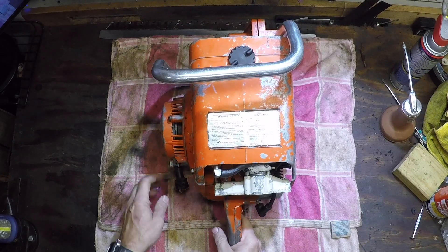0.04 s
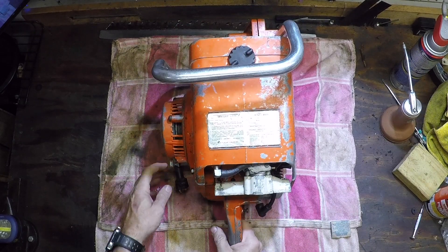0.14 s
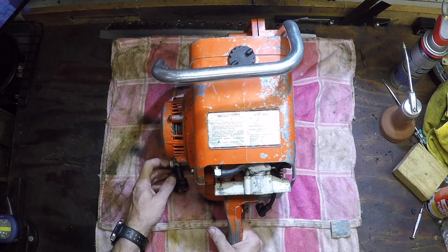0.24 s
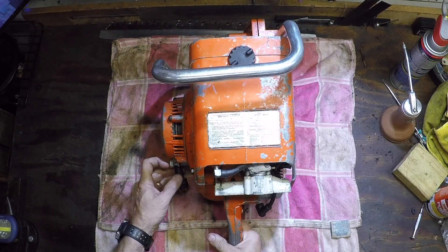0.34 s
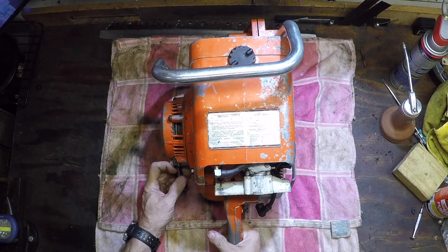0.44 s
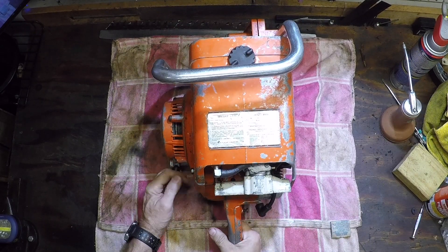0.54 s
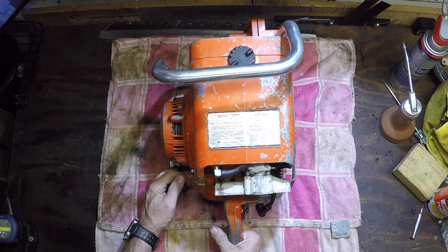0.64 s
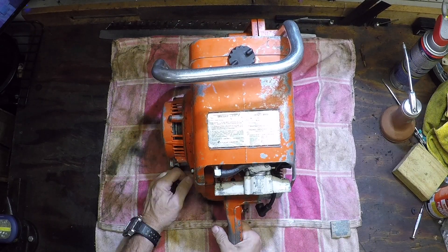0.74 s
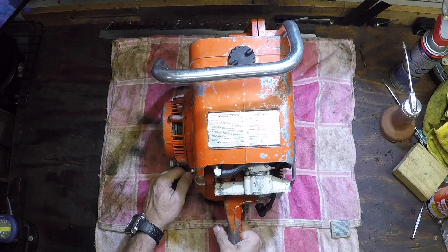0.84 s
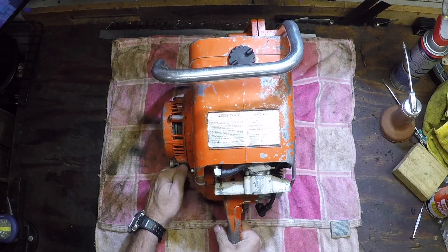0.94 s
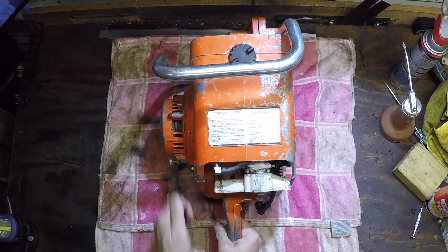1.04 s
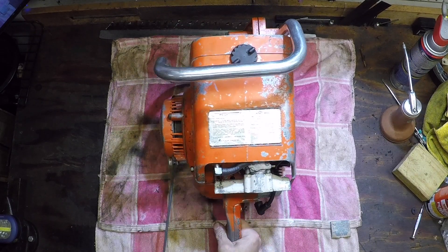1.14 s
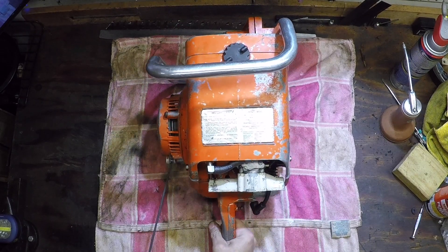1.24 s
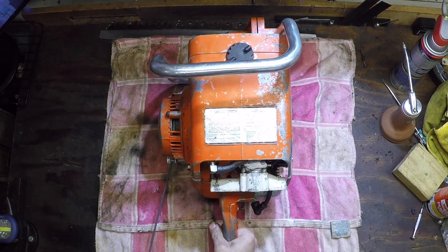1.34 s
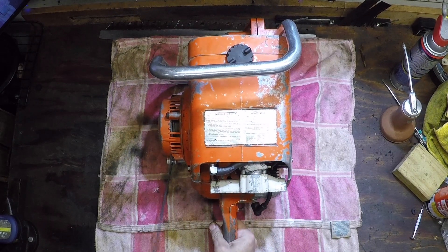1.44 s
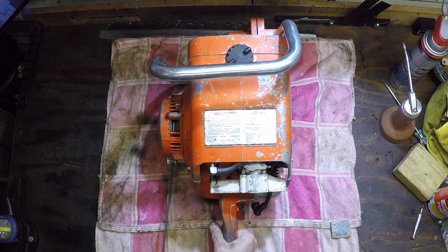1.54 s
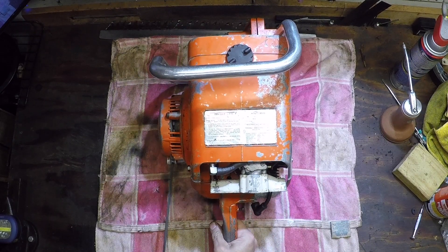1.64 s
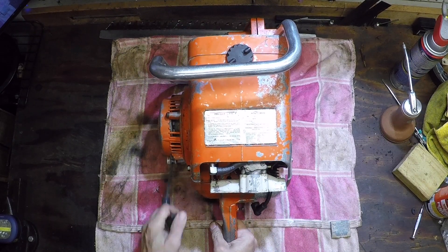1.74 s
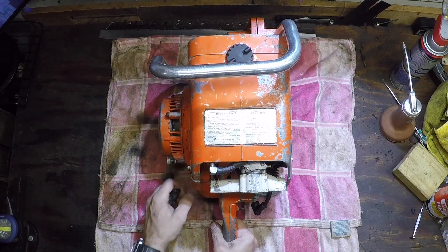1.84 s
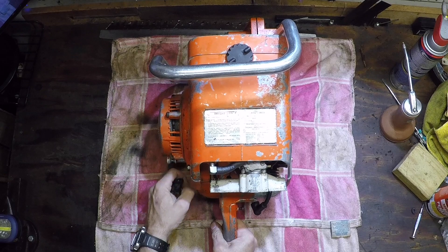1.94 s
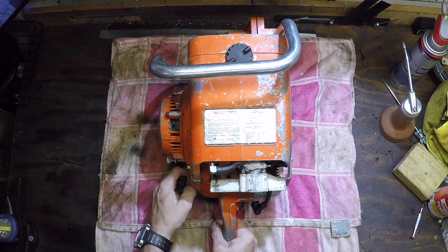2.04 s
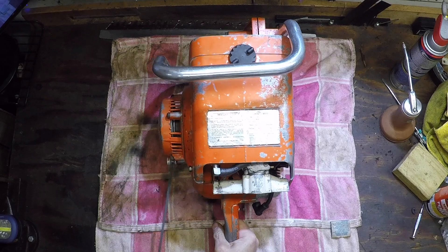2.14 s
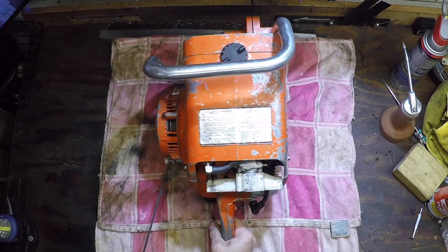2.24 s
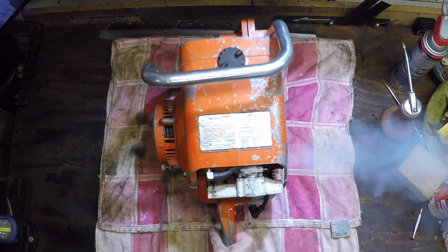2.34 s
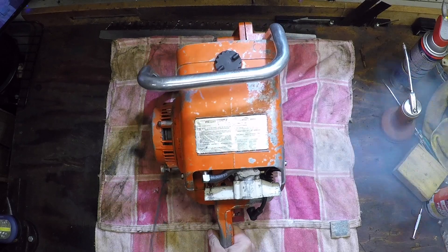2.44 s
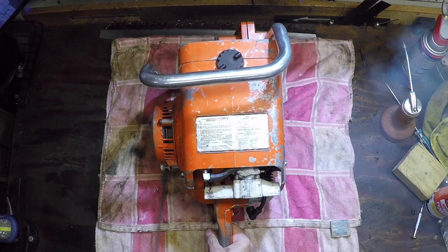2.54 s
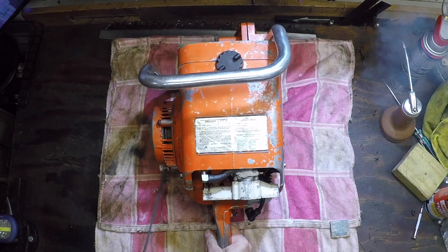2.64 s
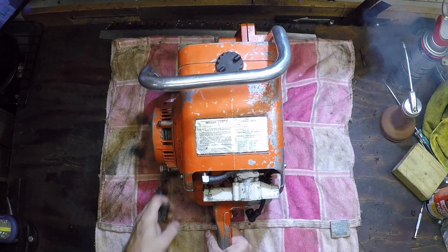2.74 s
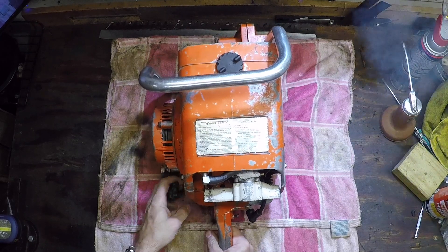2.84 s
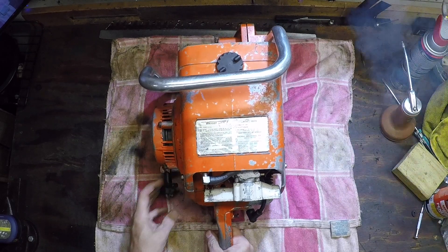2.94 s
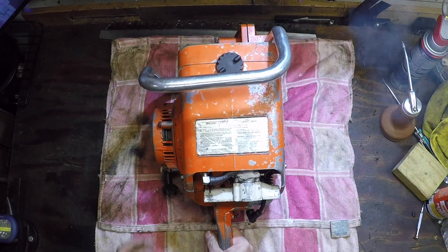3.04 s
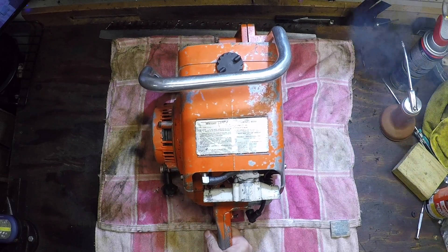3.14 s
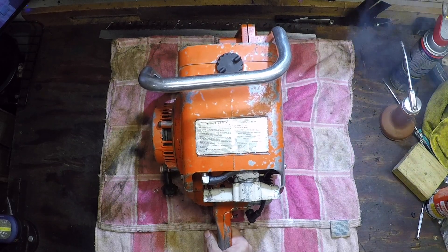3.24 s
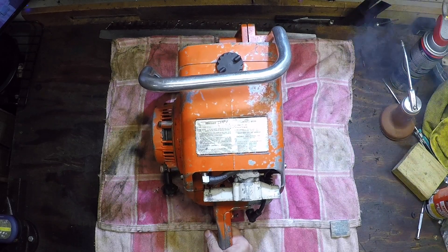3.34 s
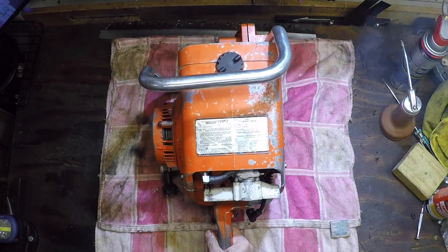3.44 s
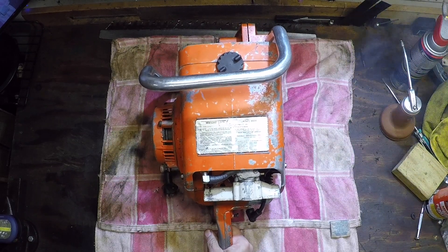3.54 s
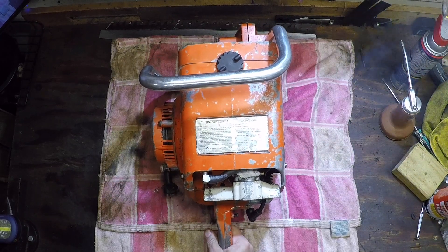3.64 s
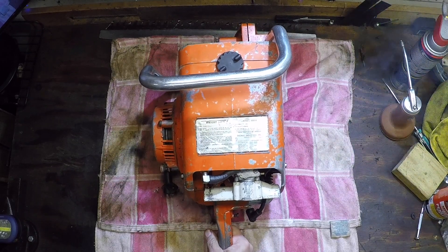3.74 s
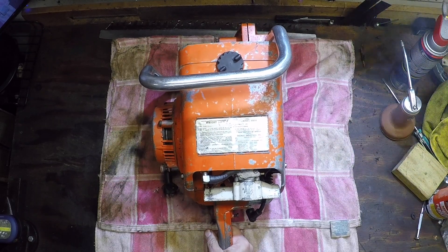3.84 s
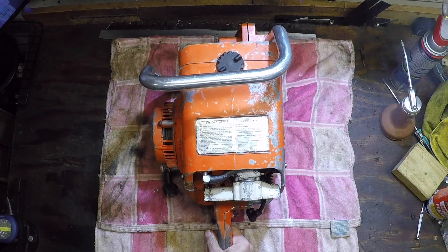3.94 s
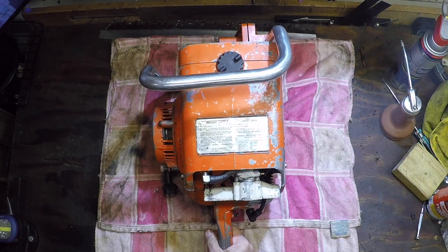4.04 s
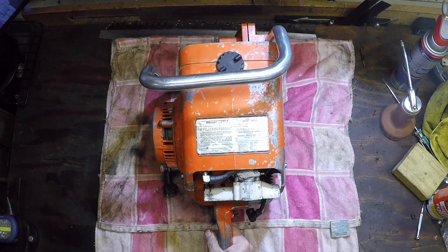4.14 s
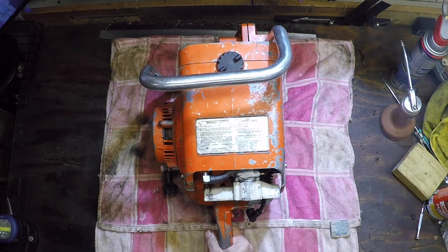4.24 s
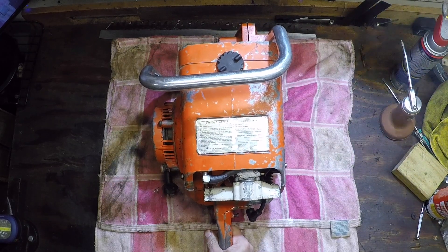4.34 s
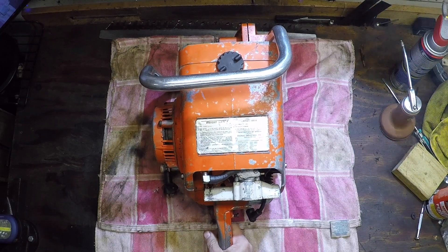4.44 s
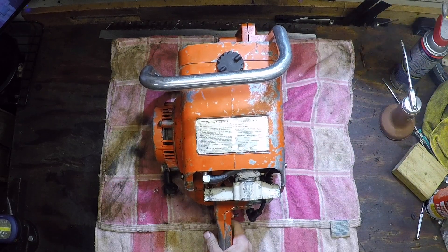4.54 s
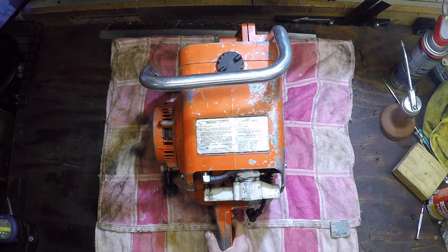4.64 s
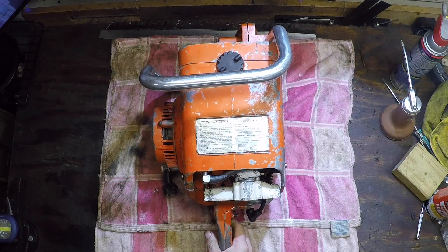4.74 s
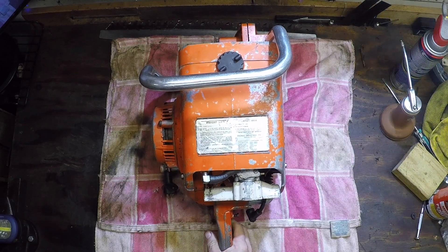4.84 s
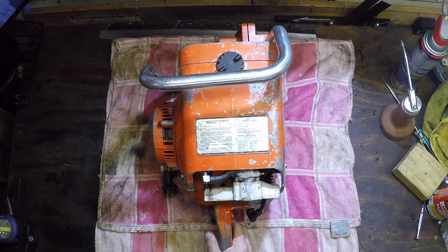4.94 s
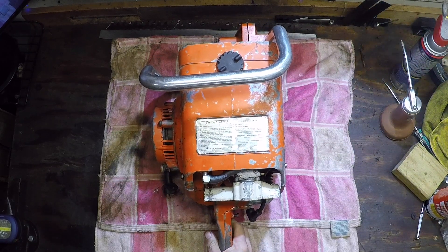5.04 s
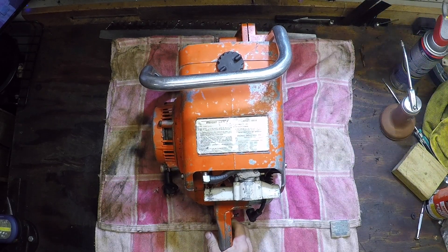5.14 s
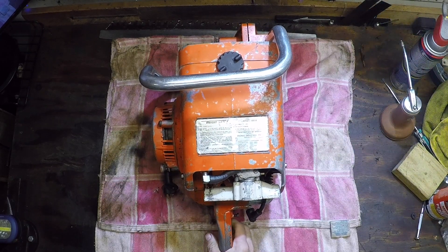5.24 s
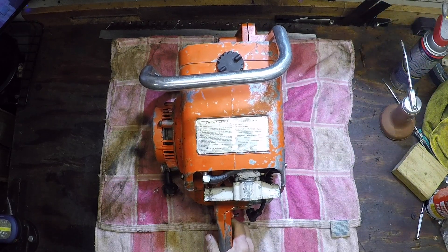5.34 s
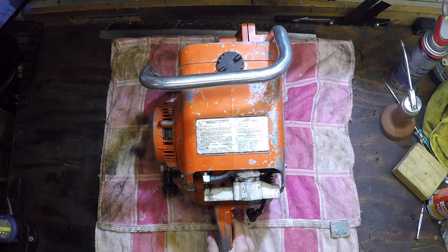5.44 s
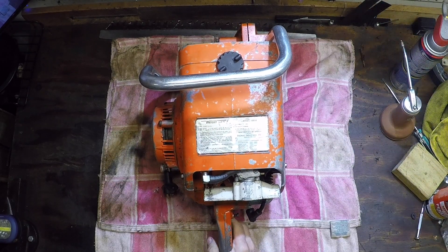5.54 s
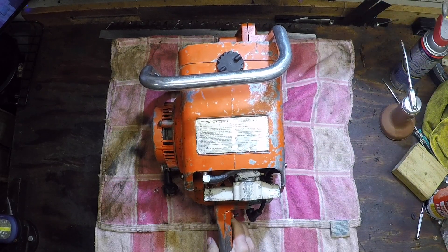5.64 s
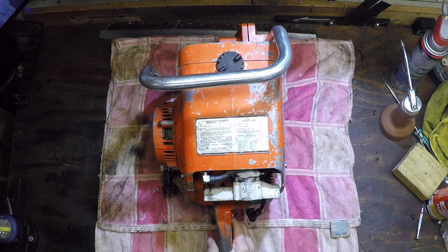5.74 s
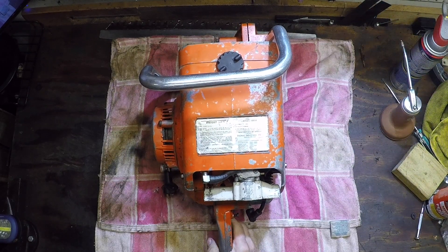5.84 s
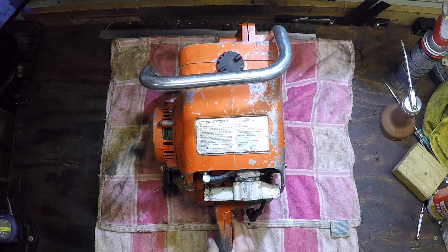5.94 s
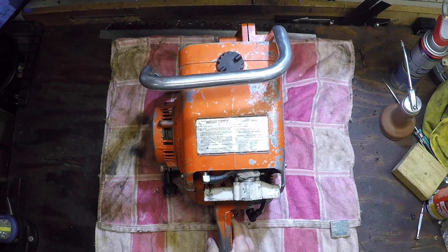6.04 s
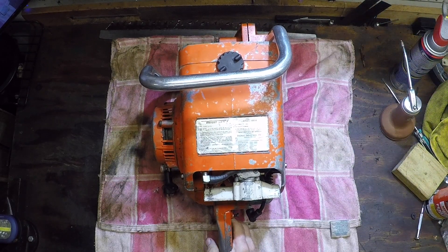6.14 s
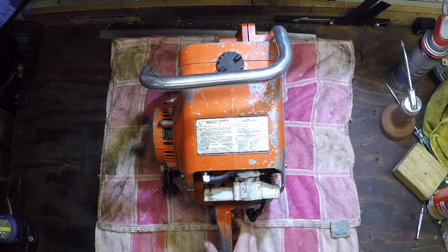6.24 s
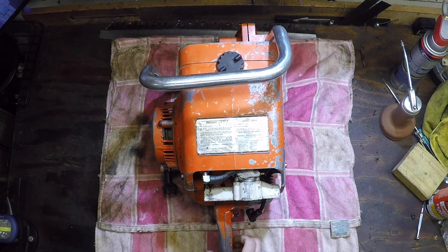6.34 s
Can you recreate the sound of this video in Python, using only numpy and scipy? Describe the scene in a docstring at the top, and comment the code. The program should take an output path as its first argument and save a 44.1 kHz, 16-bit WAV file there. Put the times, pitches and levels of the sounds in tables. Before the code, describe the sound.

Close up in a workshop with a low, steady hum, a lever clicks on a small two-stroke chainsaw. One rasping pull of the cord only turns the engine over in dull puffs. The next pull starts it for about a second of quick popping and metallic rattling. The firing falters, the whine falls and the engine chugs to rest, leaving just the quiet hum.

```python
"""A shop motor hums and the choke of a small two-stroke saw clicks on the bench. A first pull of the
starter cord turns the engine over; a second fires it: it pops, races, misses, coasts down and stops.
Each piston stroke pushes air through the muffler, each firing rings its shell, and cord, pawls and
loose parts shake the casing. A tick on every free turn blurs into a whine that follows the crank.
The hum sinks after the loud spells and climbs back."""
import sys
import numpy as np
from scipy import signal
from scipy.fft import rfft, irfft, next_fast_len
from scipy.io import wavfile
from scipy.ndimage import map_coordinates

SR = 44100
rng = np.random.default_rng(int(sys.argv[2]) if len(sys.argv) > 2 else 0)


def log_audio(samples):
    """Write samples as a 16-bit WAV file to the path given in sys.argv[1]."""
    # one column per channel
    frames = np.atleast_2d(samples).T
    # limit to full scale, then quantise
    limited = np.clip(frames, -1, 1)
    pcm = np.round(limited * 32767).astype(np.int16)
    wavfile.write(sys.argv[1], SR, pcm)


N = 281358
T = np.arange(N) / SR

# Levels are relative: each layer adds its own gain.
# fader moves of the shop bed: (time [s], air [dB], buzz [dB], drone [dB])
BED_FADERS = [(0.0, -39.5, -31.5, -38), (0.46, -38.5, -29.5, -48), (1.0, -38, -34, -25),
              (1.72, -45, -39, -31), (2.07, -44, -34, -35), (4.25, -57, -45, -40), (4.6, -50, -41, -45.5),
              (4.89, -48, -37.5, -39), (5.2, -43.5, -34.5, -32), (5.7, -39, -28.5, -32),
              (6.12, -39, -31, -30), (6.38, -39.5, -32.5, -36)]
# colour of the room air: (frequency [Hz], level [dB])
AIR_EQ = [(15, -47.5), (25, 6), (69, -5), (125, -7.5), (168, -14), (357, -17.5), (493, -30.5), (612, -21),
          (1330, -22.5), (4010, -43.5), (6330, -45), (10000, -57), (15400, -81)]
# stereo image of the air: (frequency [Hz], left-right likeness [0-1])
AIR_IMAGE = [(60, 0.86), (200, 0.96), (400, 0.58), (700, 0.021), (15000, 0.16)]
# soft swells of hiss, the tail of the first clicks and then a few faint rustles:
# (time [s], half-width [s], level [dB])
HISS_SWELLS = [(0.157, 0.081, -37.5), (0.823, 0.11, -52.5), (1.733, .02, -52), (4.536, .02, -60),
               (5.154, 0.021, -60), (6.128, 0.051, -48)]
# shaft orders of the shop motor: (frequency [Hz], level against the buzz [dB])
SHAFT_ORDERS = [(29, -29), (146, -20), (175, -15), (203, -23), (264, -23), (291, -30.5), (437, -29.5)]
# reverb of the workshop: (frequency [Hz], t60 [s])
ROOM_DECAY = [(100, 0.84), (1000, 0.35), (6000, 0.46), (14000, 0.05)]

# modes of casing, cover and handle: (frequency [Hz], width [Hz], level [dB])
CASING_MODES = [(702.2, 25.6, 4.5), (995, 42.5, 6.5), (1263, 22, 1.5), (1355, 12, -5.5), (1665, 47, 0.5),
                (2300, 140, -21), (3580, 500, -54)]
# modes of the starter pawls and steel handle: (frequency [Hz], width [Hz], level [dB])
STEEL_MODES = [(3510, 120, -8), (4120, 90, -11), (5500, 55, 0), (5820, 260, -1), (6500, 150, -6),
               (7200, 150, -9)]
# lever, pawl and handle hits: (time [s], level [dB], knock offset [dB], ring offset [dB])
CLICKS = [(0.0641, -7, -26, -11), (0.1206, -6, -1, -11), (0.389, -32, -14, 1.5), (1.0238, -17.5, -11, -13),
          (1.047, -5.5, -8, -0.5), (1.3245, -21, -19, 9.5), (1.4744, -14, 10, -36), (1.596, -25.5, 18, -22),
          (1.6253, -15.5, -2, -20), (2.0862, -28, -18, -18), (2.1115, -5, 4, -7.5),
          (2.1767, -13.5, 14, -27), (2.3207, -16.5, -16, -5), (3.7509, -25, -6, -4),
          (3.8047, -24.5, -5, -7), (3.8872, -21.5, -12, -12), (3.9795, -23.5, 10, -7),
          (4.0868, -36, 7, -20), (4.1117, -27, 6.5, -25), (4.5349, -48.5, 23.5, -12)]
# colour of a click's snap: (frequency [Hz], level [dB])
SNAP_EQ = [(530, -27.5), (900, -5), (1250, -15), (1650, -1.5), (2750, -11.5), (3970, -5), (4260, -12.5),
           (6090, -4.5), (13300, -39.5), (15400, -80.5)]
# shaking by cord, pawls, fan and loose parts, a list per pull: (time [s], casing [dB], fizz [dB])
RATTLE_FADERS = [
    [(1.0, -45, -74), (1.086, -26, -31), (1.23, -22.5, -26), (1.438, -29.5, -31), (1.596, -47, -44),
     (1.75, -66, -50)],
    [(2.07, -47, -47), (2.15, -25.5, -31.5), (2.26, -26.5, -27), (2.6, -28.5, -29), (3.02, -25, -26),
     (3.15, -34.5, -25.5), (3.43, -25.5, -29), (3.9, -40.5, -43), (4.15, -49, -58), (4.25, -71, -68.5)],
]
# colour of the air fizz: (frequency [Hz], level [dB])
FIZZ_EQ = [(710, -4.5), (1200, -3.5), (1710, 0), (2790, -7), (3640, -3.5), (4650, -9), (6140, -1.5),
           (10100, -19), (11300, -35), (13100, -27), (15400, -59)]
# crack on each bang, sharpest on the first firings: (time [s], offset from the bang [dB])
CRACK_FADER = [(2.2, -14), (2.32, -1), (2.6, -8), (2.8, -14)]
# casing modes that sing in the whine: (frequency [Hz], width [Hz], level [dB])
WHINE_MODES = [(454, 160, -7), (687, 350, -11), (999, 61, 2)]
# modes of the muffler shell, rung by hot gas: (frequency [Hz], width [Hz], level [dB])
SHELL_MODES = [(540, 75, -11), (616, 9.4, 7.5), (660, 11, -12)]
# modes of muffler, bench and walls: (frequency [Hz], width [Hz], level [dB], polarity [+1 or -1])
MUFFLER_MODES = [(43.4, 7.4, -11.5, 1), (96.6, 12.3, 2, 1), (146.5, 17.3, 2, -1), (188.2, 27.2, 5, -1),
                 (199, 225, -8.5, 1), (285.2, 15, 5.5, -1), (337, 4.4, 4.5, 1), (393.3, 25, 7, 1)]

# the cord drags the crank over, or it rocks to rest: (time [s], puff [dB], bang [dB])
SLOW_STROKES = [(1.055, -8, -28), (1.105, -28.5, -3.5), (1.178, -5, -6), (1.236, -2, -21), (1.298, -16, -9),
                (1.375, -14, -7), (1.481, -19.5, -14.5), (1.502, -17.5, -37), (2.115, -9.5, -18.5),
                (2.192, -4, -6.5), (2.244, -9.5, -6), (2.287, -8.5, -7.5), (3.89, -12, -29),
                (3.985, -18, -52), (4.119, -29, -51)]
# the free crank revs up, holds while it fires, then drag slows it: (time [s], speed [turns/s])
CRANK_SPEED = [(2.322, 42.34), (2.45, 61.61), (2.6, 78.7), (2.78, 76.75), (2.9, 74.54), (3.1, 76.06),
               (3.3, 60.24), (3.5, 42.38), (3.65, 29.48), (3.81, 14.76)]
# cold puff and casing tick of the free turns: (time [s], puff [dB], tick [dB])
TURN_FADERS = [(2.33, -19, 17.5), (2.45, -35, 21), (2.56, -24.5, 21), (2.63, -7.5, 32), (2.72, -5.5, 28),
               (2.95, -10, 26), (3.1, -7, 25), (3.19, -5.5, 32.5), (3.26, -6, 24), (3.34, -9.5, 29.5),
               (3.42, -5.5, 21.5), (3.55, -6, 23.5), (3.798, -6.5, 22)]
# the charge fires every second turn at first, then every third to fifth: (time [s], bang [dB])
FIRINGS = [(2.322, -3.5), (2.366, -4.5), (2.404, -2.5), (2.439, -4), (2.472, -2), (2.502, -5),
           (2.531, -5.5), (2.558, -6.5), (2.585, -5), (2.623, -6), (2.661, -6.5), (2.700, -7), (2.739, -9),
           (2.804, -6.5), (2.857, -4.5), (2.897, -11), (2.949, -8), (3.003, -7.5)]

# stereo image of clicks and rattle: (frequency [Hz], left-right likeness [0-1])
SAW_IMAGE = [(300, 0.92), (500, 0.27), (1000, 1), (2500, 0.79), (6000, 0.38), (9000, .4), (12000, 0.46)]
# pan of the saw: (frequency [Hz], left over right [dB])
SAW_PAN = [(40, -.9), (150, -2), (350, -2.2), (700, -4.3), (1400, .6), (2800, .1), (5600, -1.2),
           (10000, -1.6), (14000, .2)]
# stereo phase of the saw: (frequency [Hz], left lead [rad])
SAW_PHASE = [(300, 0), (450, .4), (700, 1.3), (1290, 1.8), (1550, .7), (2900, .3), (4900, .5), (6100, 1),
             (7600, 2), (9000, 2.4), (11000, .4)]


def amp(db):
    return 10 ** (np.asarray(db) / 20)


def unit_rms(x):
    return x / np.sqrt(np.mean(x ** 2) + 1e-20)


def along(points, hz):
    """Read a (frequency, value) curve on a log axis."""
    f, values = np.transpose(points)
    return np.interp(np.log(hz + 1), np.log(f + 1), values)


def automation(table, times):
    """One curve per value column of a timed table."""
    at, *columns = np.transpose(table)
    return [np.interp(times, at, column) for column in columns]


def wobble(rate):
    """A smooth random curve, rate knots a second."""
    return map_coordinates(rng.standard_normal(int(N * rate / SR) + 4), [T * rate])


def filtered(x, response):
    """Shape x with a complex frequency response."""
    size = next_fast_len(N + SR // 2)
    return irfft(rfft(x, size) * response(np.fft.rfftfreq(size, 1 / SR)), size)[..., :N]


def modes(table, f):
    """Response of a resonator bank; a fourth column sets a mode's polarity."""
    return sum(np.prod(polarity) * amp(db) * 1j * f * width / (hz * hz - f * f + 1j * f * width)
               for hz, width, db, *polarity in table)


def spikes(times, db):
    """One impulse at each time."""
    return np.bincount(np.round(times * SR).astype(int), amp(db), N)[:N]


def envelope(x, t60, rise=0.001):
    """Give each impulse a quick attack and an exponential decay."""
    attack, decay = np.exp(-1 / (rise * SR)), amp(-60 / (t60 * SR))
    return signal.lfilter([1 - attack], np.convolve([1, -attack], [1, -decay]), x)


def spread(pair, image):
    """Mix two unrelated signals to a left and right of the given likeness."""
    angle = lambda f: np.arccos(np.clip(along(image, f), -1, 1)) / 2
    mid, side = filtered(pair, lambda f: np.array([np.cos(angle(f)), np.sin(angle(f))]))
    return np.array([mid + side, mid - side])


def shop_air(air_db, hiss_db=-15.5):
    """Dark room tone and a thin hiss that swells after the first clicks, then in a few faint rustles."""
    noise = filtered(rng.standard_normal((2, N)),
                     lambda f: amp(along(AIR_EQ, f)) / (1 + (45 / (f + 1)) ** 2))
    dark = filtered(noise, lambda f: 1 / (1 + (f / 2800) ** 4))
    level = amp(air_db + 6 + 0.63 * wobble(3.363))
    swells = sum(amp(db) * np.exp(-((T - at) / width) ** 2) for at, width, db in HISS_SWELLS)
    hiss = (level * amp(hiss_db) + swells) * unit_rms(noise - dark)
    return spread(level * unit_rms(dark) + hiss, AIR_IMAGE)


def shop_motor(buzz_db, drone_db, beat_s=0.892, crest_s=5.83):
    """Mains buzz, wavering shaft orders and a low drone that beats."""
    tone = lambda hz, sway: np.sqrt(2) * np.sin(2 * np.pi * hz * T + sway * wobble(6))
    mains = amp(.7 * wobble(7.3)) * tone(120, sway=0.075)
    shaft = sum(amp(db + 2.6 * wobble(5)) * tone(hz, sway=1) for hz, db in SHAFT_ORDERS)
    drone = np.cos(np.pi * (T - crest_s) / beat_s) * tone(58.6, sway=0.32)
    return amp(buzz_db) * (mains + shaft) + amp(drone_db) * drone


def room_reverb(x):
    """The walls answer with a tail in which each frequency dies at its own speed."""
    hz, t, spectrum = signal.stft(rng.standard_normal((2, SR // 2)), SR, nperseg=256)
    tail = signal.istft(spectrum * amp(-60 * t / along(ROOM_DECAY, hz)[:, None]), SR, nperseg=256)[1]
    predelayed = np.pad(x, ((0, 0), (400, 0)))
    return signal.fftconvolve(predelayed, tail / np.linalg.norm(tail[0]), axes=1)[:, :N]


def clicks():
    """Lever, pawl and handle contacts: a short snap, a knock in the casing and a ring of steel."""
    times, db, knock_db, ring_db = np.transpose(CLICKS)
    noise = rng.standard_normal((3, 2, N))
    snap = unit_rms(filtered(noise[0], lambda f: amp(along(SNAP_EQ, f))))
    snap *= envelope(spikes(times, db - 4.5), t60=0.057, rise=0.0011)
    hits = spikes(times + 0.002974, db + knock_db + 17.5)
    impact = noise[1] * envelope(hits, t60=0.063, rise=0.0022) + amp(19.5) * hits
    knock = filtered(impact, lambda f: modes(CASING_MODES, f) / (1 + 1j * f / 550) ** 2)
    burst = noise[2] * envelope(spikes(times, db + ring_db + 25.5), t60=0.024, rise=0.0026)
    ring = filtered(burst, lambda f: modes(STEEL_MODES, f) ** 2)
    return spread(snap + knock + ring, SAW_IMAGE)


def rattle(times, bang_db):
    """Casing chatter, air fizz, steel jingle and rough muffler flow; every bang opens with a crack."""
    gate = sum((T > pull[0][0]) & (T < pull[-1][0]) for pull in RATTLE_FADERS)
    shake, rush = gate * amp(automation(np.concatenate(RATTLE_FADERS), T))
    crack_db, = automation(CRACK_FADER, times)
    crack = envelope(spikes(times + .002, bang_db + crack_db), t60=.01)
    grit = unit_rms(amp(1.43 * wobble(45)) * rng.standard_normal((4, 2, N)))
    grit[0] *= 1 + envelope(amp(2) * (rng.random(N) < 70 / SR), t60=.02)  # loose parts strike

    def layer(noise, level, response):
        return filtered(noise * level, response) / np.std(filtered(noise[0], response))

    casing = layer(grit[0], amp(1) * shake + amp(-34) * crack,
                   lambda f: modes(CASING_MODES, f) / (1 + 1j * f / 5000) ** 2)
    fizz = layer(grit[1], amp(4.5) * rush + crack, lambda f: amp(along(FIZZ_EQ, f)))
    jingle = layer(grit[2], amp(-14.5 + 1.4 * wobble(21)) * rush, lambda f: modes(STEEL_MODES, f) ** 2)
    flow = layer(grit[3], amp(-1) * shake, lambda f: modes(MUFFLER_MODES, f) / (1 + 1j * f / 150) ** 2)
    return spread(casing + fizz + jingle + flow, SAW_IMAGE)


def whine(times, tick_db):
    """Every free turn ticks the casing, so the crank's overtones sing as they slide through its modes."""
    ticks = spikes(times, tick_db + rng.normal(0, 0.67, len(times)))
    casing = lambda f: sum(amp(db) * modes([(hz, width, 0)], f) ** 2 for hz, width, db in WHINE_MODES)
    return filtered(ticks, casing)


def knocks(times, bang_db):
    """Slow strokes jolt the casing; firings ring the muffler shell, harder as the gas gets hotter."""
    soften = lambda f: 1j * f / (600 + 1j * f) / (1 + 1j * f / 1300) ** 2
    slow_times, puff_db, _ = np.transpose(SLOW_STROKES)
    thud_mode = (645, 780, -22)  # (frequency [Hz], width [Hz], level [dB])
    jolts = spikes(slow_times + 0.0011, puff_db + 25.5)
    casing = filtered(jolts, lambda f: modes([*CASING_MODES, thud_mode], f) * soften(f))
    heat_db = np.interp(times, [2.3, 2.9], [33, 45])
    blasts = spikes(times + 0.00199, bang_db + heat_db)
    return casing + filtered(blasts, lambda f: modes(SHELL_MODES, f) * soften(f))


def crank(unfired_db=-41.5):
    """One stroke a turn: gives (time, puff, bang) of all strokes, then the free turns' times and ticks."""
    at, speed = np.transpose(CRANK_SPEED)
    running = T[(T >= at[0]) & (T < at[-1])]
    turns = np.cumsum(np.interp(running, at, speed)) / SR
    times = np.interp(np.arange(int(turns[-1]) + 1), turns, running)
    scatter_db = rng.normal(0, [.3, 1.2], (len(times), 2))
    puff_db, tick_db = automation(TURN_FADERS, times)
    puff_db += scatter_db[:, 0]
    bang_db = puff_db + unfired_db + scatter_db[:, 1]  # a cold turn has only a faint edge
    for fire_s, db in FIRINGS:
        bang_db[np.argmin(abs(times - fire_s))] = db
    free_strokes = np.column_stack([times, puff_db, bang_db])
    return np.concatenate([SLOW_STROKES, free_strokes]).T, times, tick_db


def exhaust(times, puff_db, bang_db):
    """Each stroke pushes a slug of air through the muffler: slowly when cold, fast when it fires."""
    def slug(corner_hz):
        return lambda f: 1j * f / (1 + 1j * f / corner_hz) ** 3 * modes(MUFFLER_MODES, f)

    puffs = filtered(spikes(times, puff_db + 37.5), slug(corner_hz=32.55))
    bangs = filtered(spikes(times + 0.0013, bang_db + 15), slug(corner_hz=113.8))
    return puffs + bangs


def scene():
    """The saw, placed in stereo over the shop bed; only the clicks feed the reverb."""
    (times, puff_db, bang_db), turn_times, tick_db = crank()
    contacts = clicks()
    engine = exhaust(times, puff_db, bang_db) + knocks(times, bang_db)
    saw = engine + rattle(times, bang_db) + whine(turn_times, tick_db)
    saw += contacts + amp(-10) * room_reverb(contacts)
    side = np.array([[.5], [-.5]])
    pan = lambda f: amp(side * along(SAW_PAN, f)) * np.exp(1j * side * along(SAW_PHASE, f))
    air_db, buzz_db, drone_db = automation(BED_FADERS, T)
    bed = shop_air(air_db) + shop_motor(buzz_db, drone_db)
    return filtered(saw, pan) + bed * amp([[-.8], [.8]])  # the bed leans right


def record(dry, top_hz=15500):
    """Round off peaks near full scale and cut the extreme treble."""
    rounded = dry / (1 + np.abs(dry / .98) ** 6) ** (1 / 6)
    return filtered(rounded, lambda f: np.clip((top_hz - f) / 150, 0, 1) ** 2)


dry = scene()
out = record(dry)
log_audio(out)
```